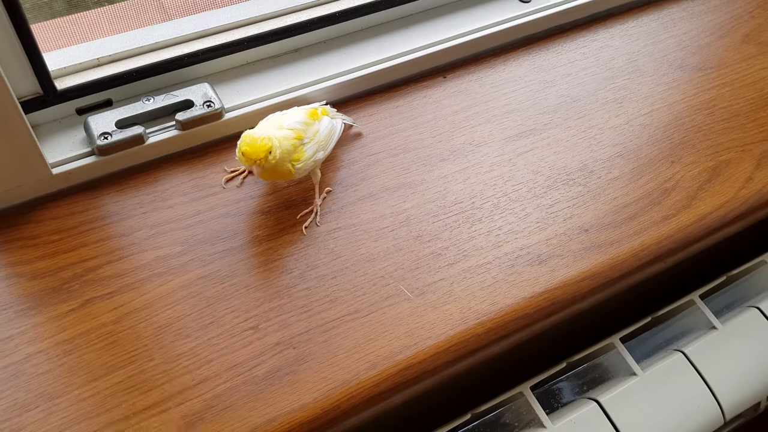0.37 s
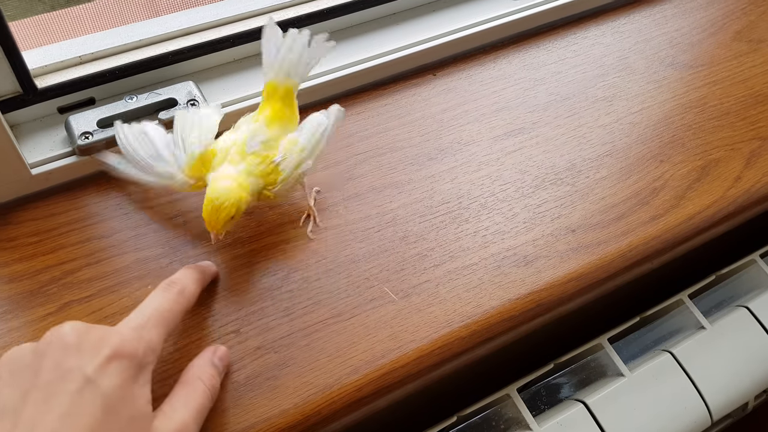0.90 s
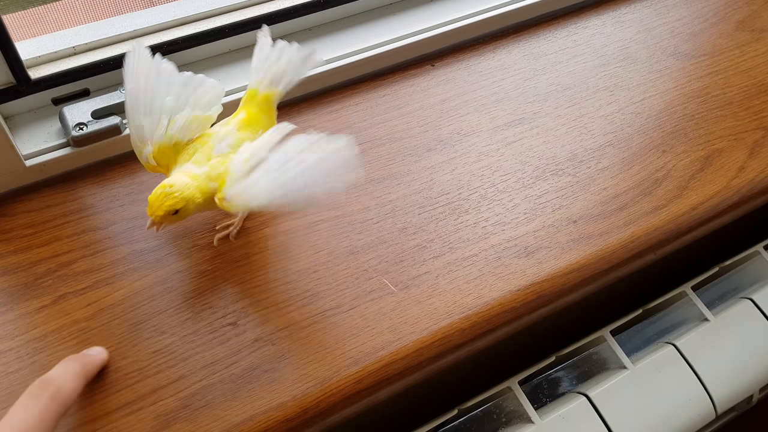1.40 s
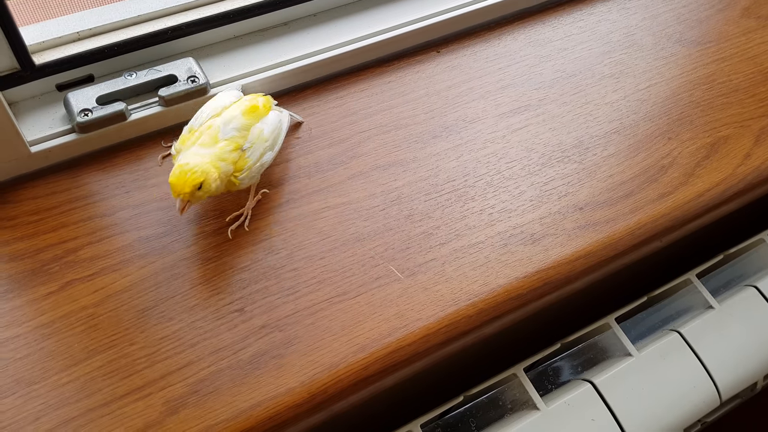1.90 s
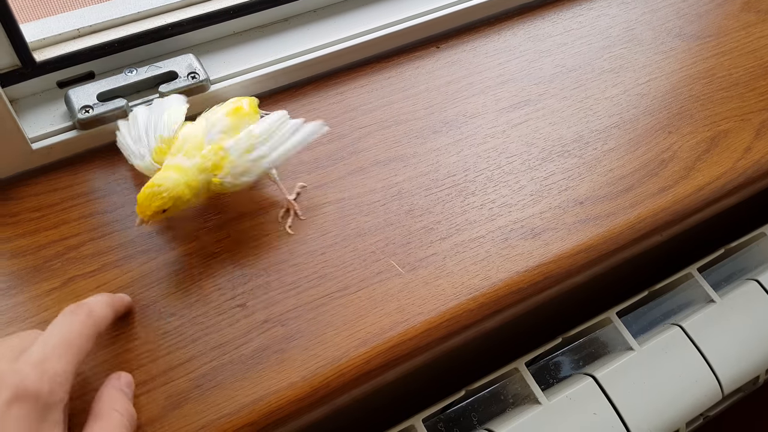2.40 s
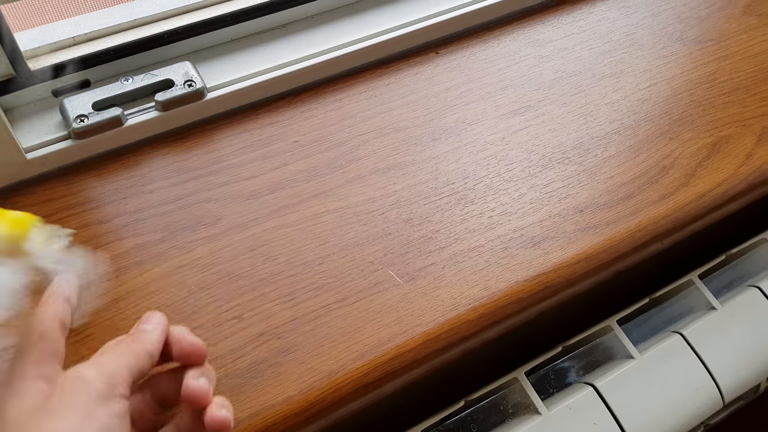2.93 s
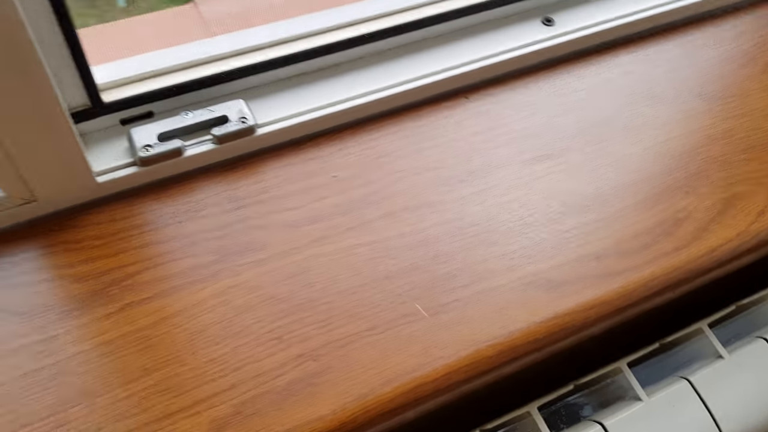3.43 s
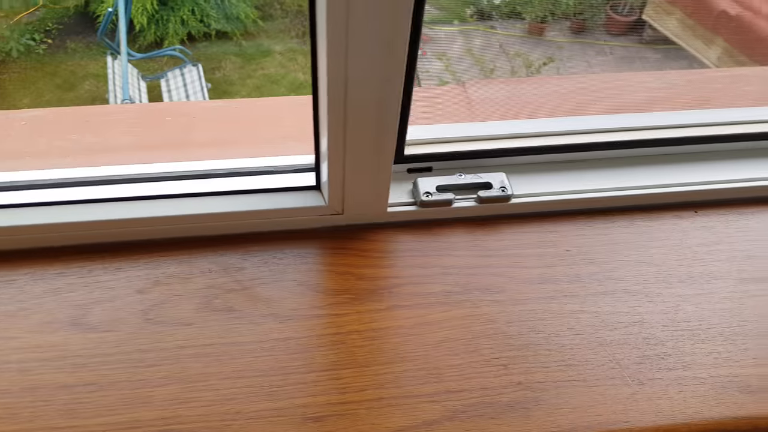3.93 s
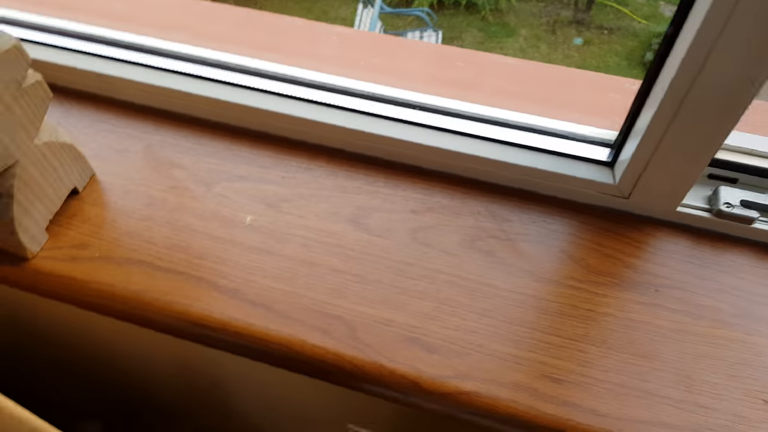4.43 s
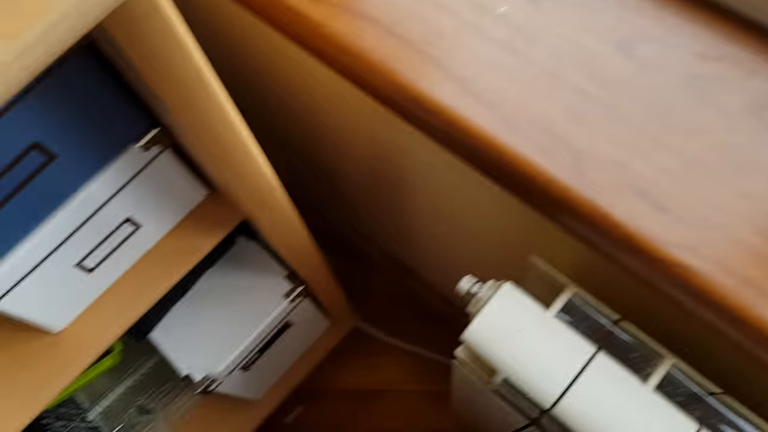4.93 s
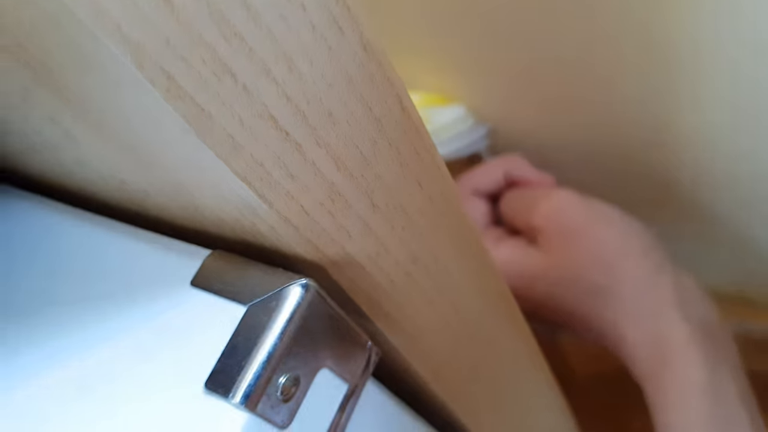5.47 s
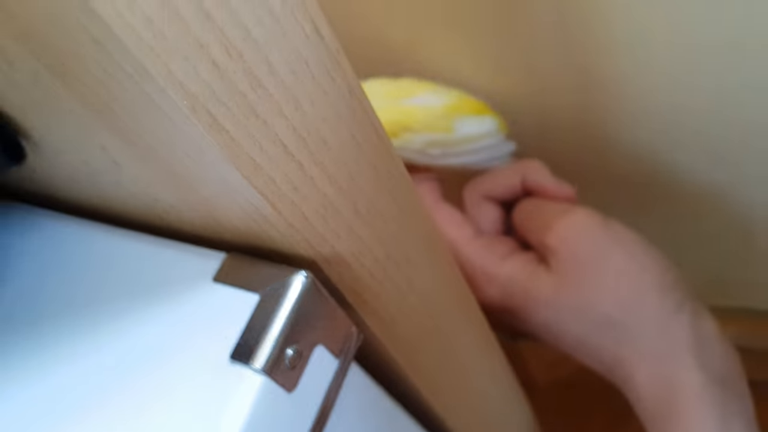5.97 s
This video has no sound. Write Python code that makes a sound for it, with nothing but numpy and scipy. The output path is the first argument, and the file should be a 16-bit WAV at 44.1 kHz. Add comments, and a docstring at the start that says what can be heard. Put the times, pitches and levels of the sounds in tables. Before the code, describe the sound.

Short scratchy canary scolding in a quiet room, a soft sill tap, then fast slapping wingbeats very near, ending with a sharp click and brief wood rub.

```python
"""A wooden window sill: a small bird rasps at a hand four times, then flutters off close past a phone.
The rasp is short noisy pulses through throat resonances; each wing beat is a feathery slap of grainy
noise with a low push of air. Puffs and feather swishes are shaped noise. Taps on the sill fall in pitch.
Later the phone is bumped, which rings its body modes, and a hand slides on wood as swept noise."""
import sys
import numpy as np
from scipy import signal
from scipy.fft import rfft, irfft
from scipy.io import wavfile
from scipy.ndimage import uniform_filter1d, map_coordinates

SR = 44100
rng = np.random.default_rng(int(sys.argv[2]) if len(sys.argv) > 2 else 0)


def voltage_ratio(decibels):
    """Convert decibels (scalar or array-like) to amplitude ratios, 20 dB per decade."""
    exponent = np.asarray(decibels, float) / 20
    return 10 ** exponent


def put_to_file(sound):
    """Save the sound as 16-bit audio at rate SR, in the file named by the first command-line argument."""
    columns = np.atleast_2d(sound).T  # one column per channel
    safe = np.clip(columns, -1, 1)
    whole_steps = np.round(safe * 32767)
    wavfile.write(sys.argv[1], SR, whole_steps.astype(np.int16))


N = 268613

# Room tone. Each row: time in seconds, level in dB, treble lift in dB.
ROOM_LEVEL = [(0, -58, 2.5), (2.1, -58.5, 3), (2.5, -57.5, 9), (4.6, -66, 16), (4.8, -63.5, 5.5),
              (5.4, -62.5, 4.5), (5.6, -61.5, 4), (6.09, -59.5, -1.5)]
# Room tone colour. Each row: frequency in Hz, relative density in dB per Hz.
ROOM_TONE = [(15, -36), (25, -11.5), (59, 7), (97, -10), (161, -2), (293, -12), (416, -13.5), (489, -16),
             (796, -10.5), (1560, -31), (3340, -40), (6380, -35), (7510, -42.5), (11000, -30),
             (16000, -29.5)]
# Left-right likeness of diffuse noise. Each row: frequency in Hz, correlation from 0 to 1.
LIKENESS = [(60, 0.96), (300, 0.83), (1000, 0.35), (4000, 0.25), (15000, 0.102)]
ROOM_T60_S, WALL_CUT_HZ, ROOM_DB = 0.22, 8000, -11

# Feather swishes. Each row: start in seconds, length in seconds, level in dB, start and end centre in Hz.
SWISHES = [(0.597, 0.25, -62.5, 5500, 3700), (1.241, .185, -51, 6070, 2500),
           (5.483, 0.095, -73.5, 5640, 4900)]
SWISH_RISE_S, SWISH_SETTLE_S, SWISH_GLIDE_S, SWISH_FALL_S = 0.056, 0.029, 0.094, 0.03
SWISH_SETTLE_DB, SWISH_SAG_DB = -6, -17  # both relative to the swish level
# Hand sliding on wood. Each row: time in seconds, level in dB, centre in Hz.
SLIDE = [(5.78, -83, 640), (5.82, -60.5, 656), (5.85, -53, 710), (5.87, -57, 740), (5.9, -51.5, 740),
         (5.94, -61, 720), (6.0, -64, 755), (6.09, -68, 707)]

# Puffs of air and faint ticks. Each row: time in seconds, level in dB, centre in Hz, t60 in seconds.
PUFFS = [(.764, -47, 650, .06), (1.051, -42, 870, .06), (2.6, -40, 65, .37), (4.938, -50, 4000, .017),
         (5.501, -52, 6000, .015)]
# Puff that ends each buzz; level relative to the buzz.
CLOSING_PUFF_DB, CLOSING_PUFF_HZ, CLOSING_PUFF_T60_S, CLOSING_LEAD_S = 1.5, 900, 0.089, 0.0031
# Rustle after a bump. Each row: centre in Hz, level in dB relative to the click setting, t60 in seconds.
BUMP_TAIL = [(780, -17, 0.14), (2200, -34, 0.12), (5500, -24, 0.059)]

# Throat resonances. Each row: centre in Hz, width in Hz, gain in dB before lift and wander.
THROAT = [(1556, 900, -8), (2657, 530, -0.5), (3630, 430, -6), (4900, 1080, -3.5), (6200, 540, 2),
          (8450, 1400, 3.5), (10110, 1200, -0.5), (12200, 1800, -3), (14900, 3200, -19)]
# Short runs of throat clicks, gaps growing by a fixed ratio. Each row: start in seconds,
# length in seconds, first gap in seconds, first click's drive in dB, change per click in dB.
CREAKS = [(0.787, .063, .0115, -31.5, 1.0), (0.854, .02, 0.016, -32.5, 6.5), (0.877, .04, .0158, -21.5, -2),
          (.9274, .024, .0182, -33, 1), (0.972, .066, .012, -27.5, -2.0),
          (1.0445, .015, 0.014, -33.5, -2.5), (1.4204, .013, .0093, -25.5, -3), (1.46, .02, .016, -27, -6),
          (2.1405, .014, .0095, -41.5, 11.5), (2.514, .036, 0.013, -37, 6.5)]
CREAK_GAP_RATIO, CLICK_SPREAD_DB = 1.15, 4  # chance spread after the first click
# Single throat clicks. Each row: time in seconds, drive in dB.
LONE_CLICKS = [(0.775, -39), (1.3874, -40), (1.6394, -42.5), (2.4067, -38), (2.5638, -24), (2.5849, -27),
               (2.7268, -32), (2.788, -28), (2.8243, -38.5)]
# Buzzes of the call. Each row: start in seconds, length in seconds, attack in seconds, drive in dB,
# starting rate in clicks per second, left-right difference in dB, base lift of the low resonance in dB.
BUZZES = [(.78, .26, .012, -57.5, 122, -2.5, 4.5), (1.044, 0.019, 0.0076, -36.5, 220, -4.5, -3),
          (1.466, .14, .011, -37.5, 234, 1, -0.5), (2.141, 0.13, 0.047, -38, 236, 0.5, -3.5),
          (2.404, .012, .006, -54.5, 200, -10.5, -4.5), (2.581, .111, 0.0044, -37, 125, -0.5, -5.5)]
BUZZ_RELEASE_T60_S, BUZZ_END_CHANGE_DB, SPEED_UP = 0.052, 1, 2.3
# Added lift of the low and upper resonances in dB: at the start, at the end, in the release.
LOW_THROAT_DB, HIGH_THROAT_DB = (-2, 7, -16.5), (-2.5, -3, 0.5)

# Taps on the sill. Each row: time in seconds, level in dB, start and end pitch in Hz, t60 in seconds.
TAPS = [(2.192, -41.5, 340, 232, 0.21), (2.201, -45, 189, 169.8, 0.38)]
# Phone bumps. Each row: time in seconds, click drive in dB, thud level in dB, thud t60 in seconds,
# left-right difference of the click in dB.
BUMPS = [(4.942, -60.5, -26.5, 0.1, 3), (5.501, -62, -43, 0.12, -8), (5.583, -24.5, -34.5, 0.24, -13.5)]
# Body modes rung by a click. Each row: frequency in Hz, gain in dB, t60 in seconds.
BODY = [(272, 3, 0.012), (872, 10.5, 0.01), (2020, -3.5, 0.0098), (3935, -17.5, 0.0066),
        (5040, -25.5, 0.016), (6380, -22.5, 0.0086), (7340, -14, 0.0037), (10360, -19, 0.0033)]
# Thud pitch: the start is the base plus a slope times the click drive, so harder clicks start higher.
THUD_BASE_HZ, THUD_END_HZ, THUD_HZ_PER_DB = 249.6, 49.8, 2.5

# Wing beats. Each row: time in seconds, strength in dB, basic t60 in seconds.
BEATS = [(2.9156, -26, 0.023), (2.9406, -42, 0.077), (2.9619, -19, 0.011), (2.9854, -32.5, 0.075),
         (3.0445, -22.5, 0.03), (3.0916, -31.5, 0.15), (3.1515, -36.5, 0.21), (3.1856, -29.5, 0.083),
         (3.2298, -27.5, 0.023), (3.272, -28.5, 0.041), (3.3103, -27, 0.03), (3.359, -40.5, 0.18),
         (3.4291, -19.5, 0.054), (3.4725, -21, 0.089), (3.508, -20.5, 0.045), (3.5163, -18, 0.061),
         (3.5666, -22.5, 0.047), (3.6081, -34.5, 0.063), (3.665, -18, 0.039), (3.7135, -14.5, 0.059),
         (3.7668, -30.5, 0.12), (3.804, -29, 0.038), (3.857, -38, 0.12), (3.944, -25.5, 0.097),
         (3.995, -33, 0.17), (4.057, -37.5, 0.08), (4.1015, -17, 0.048), (4.1567, -24.5, 0.046),
         (4.2106, -22.5, 0.091), (4.2726, -12.5, 0.058), (4.323, -26, 0.2), (4.4287, -34, 0.32),
         (4.5053, -38, 0.1), (4.5947, -49.5, 0.31)]
# Flight between slaps. Each row: time in seconds, feather hiss in dB, air push in dB,
# left-right difference of the low parts in dB.
FLIGHT = [(2.8, -72, -73, -8), (2.9, -45, -39, 0.5), (3.07, -46, -31, 2.5), (3.53, -46, -38, 3),
          (3.59, -48, -41, -0.5), (3.81, -48.5, -41, 1.5), (3.86, -53.5, -48.5, 1),
          (3.99, -52.5, -32.5, -2), (4.21, -49.5, -41.5, 0.5), (4.34, -45, -57, -2), (4.45, -58.5, -75, -1),
          (4.58, -66, -69, -3), (4.8, -107, -71.5, -9.5)]
# Feather, flutter and air push colours. Each row: frequency in Hz, relative density in dB per Hz.
FEATHERS = [(590, -9), (1000, -0.5), (1470, -5), (2150, -3.5), (2470, -3), (3620, -5.5), (5440, -4.5),
            (7440, -4.5), (10700, 0.5), (15100, -5.5), (16000, -11.5)]
FLUTTER = [(53, -23), (90, -5.5), (183, -6.5), (269, -11), (510, -8.5), (1260, -22), (1600, -23),
           (2080, -37.5), (3520, -120)]
AIR_PUSH = [(15, -36), (25, 13), (48, -4), (70, 4), (113, 4), (145, -18), (200, -5.5), (260, -39.5),
            (440, -120)]
USUAL_BEAT_DB = -27
# Dull slap part at usual strength; it grows less than the strength, so harder slaps are brighter.
DULL_DB, DULL_FOLLOWS, DULL_CHANGE_DB_PER_S = -33.5, 0.92, -4.0
THUMP_DB, THUMP_FOLLOWS = 5, 0.72  # relative to the flutter
FLUTTER_DB, FLUTTER_FROM_HISS, TREBLE_PAN_SHARE = -0.5, 0.64, 0.3

# Close sources. Each row: time in seconds, lag of left behind right in milliseconds.
LEFT_LAG = [(.5, -0.17), (1.9, -0.23), (2.3, 0.15), (2.7, -0.27), (3.2, -0.41), (3.8, -0.32), (4.2, -0.245),
            (4.7, -0.19), (5.2, 0.31)]
# Microphone ports. Each row: frequency in Hz, common gain in dB, left-right difference in dB.
PORTS = [(26, -20.5, -1.5), (40.5, -2.5, 4.5), (2500, 1.5, 1.5), (3900, 1, 2), (5500, 1.5, -5),
         (6660, -1.5, -14), (6960, -0.5, -8.5), (7500, -4.5, -0.5), (9030, -3, -3), (11200, -1, 0)]


def rms_one(x):
    """Scale to rms 1."""
    return x / np.sqrt(np.mean(x ** 2) + 1e-20)


def in_time(rows, silent_db=-120):
    """Columns at every sample; the first takes silent_db outside the table."""
    s, first, *rest = np.transpose(rows)
    t = np.arange(N) / SR
    level = np.interp(t, s, first, left=silent_db, right=silent_db)
    return [level] + [np.interp(t, s, column) for column in rest]


def at_hz(points, hz):
    """Read a spectrum on a log frequency axis."""
    point_hz, value = np.transpose(points)
    return np.interp(np.log(hz), np.log(point_hz), value)


def panned(x, pan_db):
    """Share a left-right difference between the channels."""
    return x * voltage_ratio(np.multiply.outer([0.5, -0.5], pan_db))


def drift(rate_hz):
    """Slow chance with spread 1: noise through two equal poles, run at every 40th sample."""
    r = np.exp(-2 * np.pi * rate_hz * 40 / SR)
    white = rng.standard_normal(N // 40 + 2002)
    slow = signal.lfilter([1], [1, -2 * r, r * r], white)[2000:]
    return np.interp(np.arange(N) / 40, np.arange(len(slow)), rms_one(slow))


def bandpass(x, low_hz, high_hz):
    """Resonant band between two edges."""
    return signal.sosfilt(signal.butter(2, [low_hz, high_hz], "band", fs=SR, output="sos"), x)


def smooth_lowpass(x, order, cut_hz):
    """Lowpass without delay, so that bands can be split by subtraction."""
    return signal.sosfiltfilt(signal.butter(order, cut_hz, fs=SR, output="sos"), x)


def decay(impulses, t60_s):
    """Each impulse dies away exponentially."""
    return signal.lfilter([1], [1, -voltage_ratio(-60 / t60_s / SR)], impulses + 1e-18)


def ring(clicks, hz, t60_s):
    """A unit click sets a decaying sine of height 1 ringing."""
    r, w = voltage_ratio(-60 / (t60_s * SR)), 2 * np.pi * hz / SR
    return signal.lfilter([0, np.sin(w)], [1, -2 * r * np.cos(w), r * r], clicks + 1e-18)


def noise(spectrum):
    """Coloured stereo noise of rms 1 with a left-right likeness that depends on frequency."""
    hz = np.maximum(np.arange(N // 2 + 1) * SR / N, 1)
    alike = np.clip(at_hz(LIKENESS, hz), 0, 1)
    mid, side = rfft(rng.standard_normal((2, N)))
    inside = (hz >= spectrum[0][0]) & (hz <= spectrum[-1][0])
    both = np.sqrt(1 + alike) * mid + np.sqrt(1 - alike) * side * [[1], [-1]]
    return rms_one(irfft(both * inside * voltage_ratio(at_hz(spectrum, hz)), N))


def bursts(times_s, peak_db, rise_s, t60_s):
    """Envelope of quick swells that die away exponentially; overlaps add in power."""
    out = np.zeros(N)
    for s, db, rise, t60 in np.broadcast(times_s, peak_db, rise_s, t60_s):
        start = round((s - rise / 2) * SR)
        t = np.arange(min(round(t60 * SR), N - start)) / SR
        swell = np.minimum(t / max(rise, 1 / SR), 1) ** 2
        shape = swell * voltage_ratio(db - 60 * np.maximum(t - rise, 0) / t60)
        span = slice(start, start + len(t))
        out[span] = np.hypot(out[span], shape)
    return out


def swept_noise(rows, below_oct, above_oct):
    """Noise with a moving centre: fixed bands fade with their distance from it in octaves."""
    level_db, centre_hz = in_time(rows)
    on = level_db > -94
    out, hz = np.zeros((2, N)), centre_hz[on]
    white = rng.standard_normal((2, 2, len(hz)))
    white = white + white[:, :1]  # the channels share part of the noise
    for k, middle_hz in enumerate(np.geomspace(hz.min() * 0.648, hz.max() * 2, num=16)):
        band = bandpass(white[k % 2], middle_hz / 1.08, middle_hz * 1.012)
        octaves = np.log2(middle_hz / hz)
        reach = np.where(octaves < 0, below_oct, above_oct)
        out[:, on] += rms_one(band) * np.exp(-(octaves / reach) ** 2)
    return voltage_ratio(level_db - 5) * out


def room_tone():
    """Distant rumble and microphone hiss; the rumble wavers slowly."""
    level_db, lift_db = in_time(ROOM_LEVEL, silent_db=-64)
    tone = noise(ROOM_TONE)
    bass = smooth_lowpass(tone, 2, 1500)
    return voltage_ratio(level_db) * (voltage_ratio(0.5 * drift(5.9)) * bass + voltage_ratio(lift_db) * (tone - bass))


def swish_curve():
    """Each swish rises fast and settles as its centre glides down, then sags and fades."""
    rows = []
    for start, length, db, start_hz, end_hz in SWISHES:
        after = np.array([0, SWISH_RISE_S, SWISH_RISE_S + SWISH_SETTLE_S, SWISH_GLIDE_S,
                          length - SWISH_FALL_S, length])
        hz = start_hz * (end_hz / start_hz) ** np.minimum(after / SWISH_GLIDE_S, 1)
        settled_db = db + SWISH_SETTLE_DB
        rows += zip(start + after, [-95, db, settled_db, settled_db, db + SWISH_SAG_DB, -95], hz)
    return rows


def swishes():
    """Friction noise: smooth for feathers, unsteady for the hand sliding on wood."""
    feathers = swept_noise(swish_curve(), below_oct=0.19, above_oct=1.0)
    hand = swept_noise(SLIDE, below_oct=0.54, above_oct=0.67)
    return feathers + voltage_ratio(1.3 * drift(36)) * hand


def room(x):
    """Diffuse echoes: a decaying tail of dull noise, different on each side."""
    t = np.arange(round(ROOM_T60_S * SR)) / SR
    tail = rng.standard_normal((2, len(t))) * voltage_ratio(-60 * t / ROOM_T60_S) * (t > 0.004)
    tail = signal.sosfilt(signal.butter(1, WALL_CUT_HZ, fs=SR, output="sos"), tail)
    return signal.fftconvolve(x[None], tail / np.sqrt(np.sum(tail ** 2) / 2), axes=1)[:, :N]


def puffs(width=1.65):
    """Puffs, ticks and rustles of air: bands of noise that swell quickly and die away."""
    out = np.zeros((2, N))
    closing = [(s + length - CLOSING_LEAD_S, db + CLOSING_PUFF_DB, CLOSING_PUFF_HZ, CLOSING_PUFF_T60_S)
               for s, length, _, db, *_ in BUZZES]
    tails = [(s + 0.005, click_db + db, hz, t60)
             for s, click_db, *_ in BUMPS for hz, db, t60 in BUMP_TAIL]
    for s, db, hz, t60 in PUFFS + closing + tails:
        start, size = round(s * SR) - 400, 20000
        span = slice(start, start + size)
        air = rms_one(bandpass(rng.standard_normal(size), hz / width, hz * width))
        out[:, span] += air * bursts(s, db - 8.5, 0.16 * t60, t60)[span]
    return out


def creak_clicks():
    """Times and drives of all separate clicks; gaps within a run grow by a fixed ratio."""
    k, chance = np.arange(8), rng.standard_normal((len(CREAKS), 8))
    start, length, gap, db, step_db = np.transpose(CREAKS)[:, :, None]
    after = gap * (CREAK_GAP_RATIO ** k - 1) / (CREAK_GAP_RATIO - 1)
    level_db = db + step_db * k + CLICK_SPREAD_DB * chance * (k > 0)
    kept = after <= length
    lone_s, lone_db = np.transpose(LONE_CLICKS)
    return np.append((start + after)[kept], lone_s), np.append(level_db[kept], lone_db)


def buzz_controls():
    """Each buzz swells, speeds up while the throat opens, and dies away."""
    rows = []
    for start, length, attack, db, per_s, pan_db, lift_db in BUZZES:
        end, fast = start + length, per_s * SPEED_UP
        points = [(start, db - 25, per_s, 0),
                  (start + attack, db, per_s, 0),
                  (end, db + BUZZ_END_CHANGE_DB, fast, 1),
                  (end + BUZZ_RELEASE_T60_S / 3, db - 20, fast, 2),
                  (end + BUZZ_RELEASE_T60_S, db - 60, fast, 2)]
        for s, level_db, rate, k in points:
            rows.append((s, level_db, rate, pan_db, lift_db + LOW_THROAT_DB[k], HIGH_THROAT_DB[k]))
    return in_time(sorted(rows))


def throat(x, low_db, high_db):
    """Parallel resonances; the main low one and the upper ones lift, all wander as the throat moves."""
    out = 0
    for k, (hz, width, db) in enumerate(THROAT):
        gain = voltage_ratio(db + low_db * (k == 1) + high_db * (k > 4) + 1.5 * drift(9))
        out = out + gain * bandpass(x, hz - width / 2, hz + width / 2)
    return out


def rasp():
    """Short noisy pulses through the throat: separate clicks, and fairly even trains that fuse to a buzz."""
    white = rng.standard_normal(N) + rng.standard_normal((2, N))
    s, db = creak_clicks()
    lone = np.zeros(N)
    lone[np.round(s * SR).astype(int)] = voltage_ratio(db - 6)
    level_db, per_s, pan_db, low_db, high_db = buzz_controls()
    cycles = np.cumsum(per_s * np.exp(0.15 * drift(130))) / SR
    train = (np.diff(np.floor(cycles), prepend=0) > 0) * voltage_ratio(1.5 * rng.standard_normal(N))
    pulses = 0.16 + decay(train, t60_s=0.008)  # steady air under the pulses
    pulses = pulses / np.sqrt(uniform_filter1d(pulses ** 2, size=2000))  # loudness ignores the rate
    clicks = decay(lone, t60_s=0.013)
    source = 0.9 * lone + white * (clicks + voltage_ratio(level_db) * pulses)  # clean snap starts each separate click
    return throat(panned(1, pan_db) * source, low_db, high_db)


def bumps(glide_s=0.014):
    """Sill taps and phone thuds are decaying sines falling in pitch; phone clicks ring the body modes."""
    click, thud, t = np.zeros((2, N)), np.zeros((2, N)), np.arange(8000) / SR
    thuds = list(TAPS)
    for s, click_db, thud_db, t60, pan_db in BUMPS:
        click[:, round(s * SR)] = panned(voltage_ratio(click_db), pan_db)
        thuds.append((s, thud_db, THUD_BASE_HZ + THUD_HZ_PER_DB * click_db, THUD_END_HZ, t60))
    for s, thud_db, start_hz, end_hz, t60 in thuds:
        at = round(s * SR)
        turns = end_hz * t + (start_hz - end_hz) * glide_s * (1 - np.exp(-t / glide_s))
        thud[:, at:at + len(t)] -= voltage_ratio(thud_db - 60 * t / t60) * np.sin(2 * np.pi * turns)
    return sum(voltage_ratio(db) * ring(click, hz, t60) for hz, db, t60 in BODY) + thud


def wings():
    """Feather hiss, flutter and pushed air; every beat adds a grainy slap and a thump."""
    s, beat_db, t60 = np.transpose(BEATS)
    t = np.arange(N) / SR
    hiss_db, push_db, low_pan_db = in_time(FLIGHT)
    flutter_db = FLUTTER_DB + FLUTTER_FROM_HISS * hiss_db + (1 - FLUTTER_FROM_HISS) * push_db
    extra_db = beat_db - USUAL_BEAT_DB
    dull_db = DULL_DB + DULL_FOLLOWS * extra_db + DULL_CHANGE_DB_PER_S * (s - s[0])
    thump_db = np.interp(s, t, flutter_db) + THUMP_DB + THUMP_FOLLOWS * extra_db
    flying = (t > FLIGHT[0][0]) & (t < FLIGHT[-1][0])

    feathers = noise(FEATHERS)
    below_4k, below_8k = (smooth_lowpass(feathers, 3, hz) for hz in (4000, 8000))
    grain = voltage_ratio(4.5 * drift(130))  # single feathers catch and let go
    bright = voltage_ratio(2.5 * drift(40)) * grain * (below_8k - below_4k)
    top = voltage_ratio(4.7 * drift(28)) * (feathers - below_8k)
    crack = bursts(s, 0, 0.00054, 0.0049)  # first contact is the sharpest
    slap = bursts(s, beat_db - 7.5, 0.0023, t60) * bright
    slap += bursts(s, beat_db - 8, 0.004, 0.87 * t60) * top
    slap += (1 + crack) * bursts(s, dull_db, 0.0057, t60) * grain * below_4k
    hiss = voltage_ratio(hiss_db + 0.43 * drift(60)) * feathers
    high = panned(slap + hiss, TREBLE_PAN_SHARE * low_pan_db)

    thump = bursts(s, thump_db, 0.012, 1.32 * t60)
    flutter = (flying * voltage_ratio(flutter_db) + thump) * noise(FLUTTER)
    stroke = np.interp(t, s, np.arange(len(s)))  # one turn per beat
    pumping = 1 + 0.52 * np.cos(2 * np.pi * (stroke - 0.1))
    push = flying * voltage_ratio(push_db) * pumping * noise(AIR_PUSH)
    return high, panned(flutter + push, low_pan_db)


def scene():
    """Close sources reach the ports at slightly different times; echoes and room tone are diffuse."""
    high, low = wings()
    airborne = high + rasp() + puffs() + swishes()
    near = airborne + low + bumps()
    lag_s = np.interp(np.arange(N) / SR, *np.transpose(LEFT_LAG)) / 1000
    right = map_coordinates(near[1], [np.arange(N) + lag_s * SR], order=3, mode="nearest")
    echoes = voltage_ratio(ROOM_DB) * room(airborne.mean(axis=0))
    return np.array([near[0], right]) + echoes + room_tone()


def top_cut(x):
    """Nothing passes above the cut-off."""
    return signal.sosfilt(signal.butter(12, 16980, fs=SR, output="sos"), x)


def record(dry):
    """The microphone ports thin the deepest bass and colour the treble, each in its own way."""
    hz = np.maximum(np.arange(N // 2 + 1) * SR / N, 1)
    port_hz, both_db, pan_db = np.transpose(PORTS)
    colour = panned(voltage_ratio(np.interp(hz, port_hz, both_db)), np.interp(hz, port_hz, pan_db))
    mix = irfft(rfft(dry) * colour, N)
    return top_cut(mix)


dry = scene()
out = record(dry)
put_to_file(out)
```